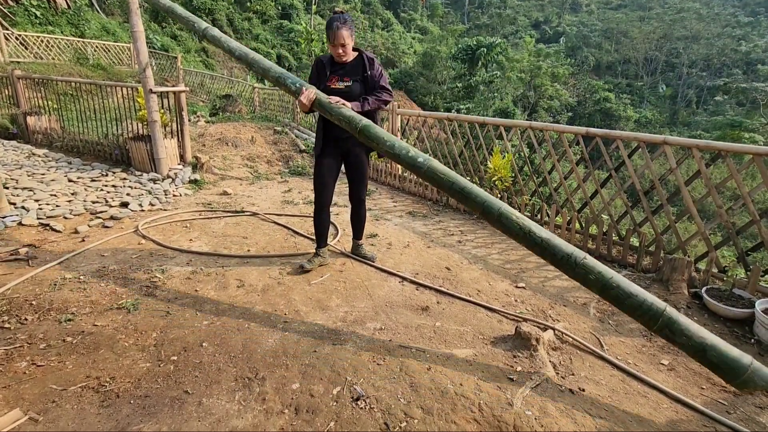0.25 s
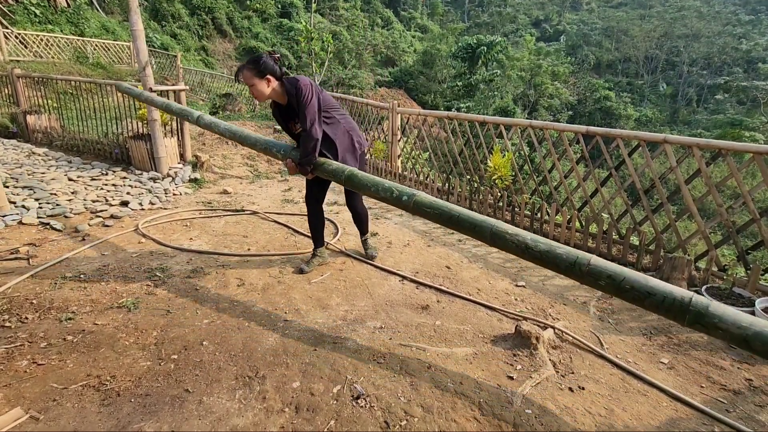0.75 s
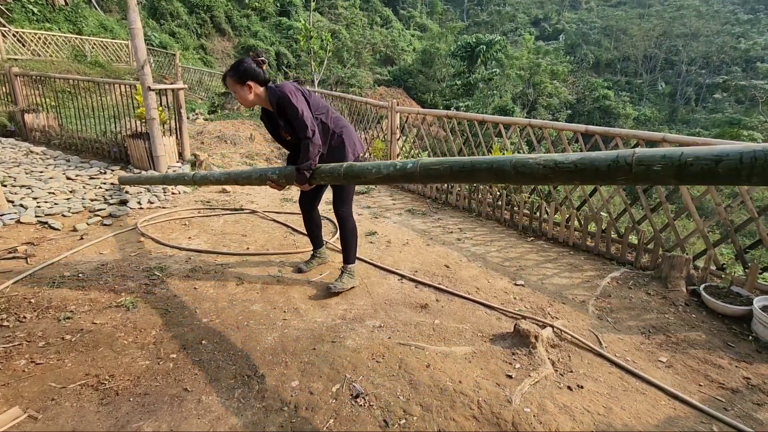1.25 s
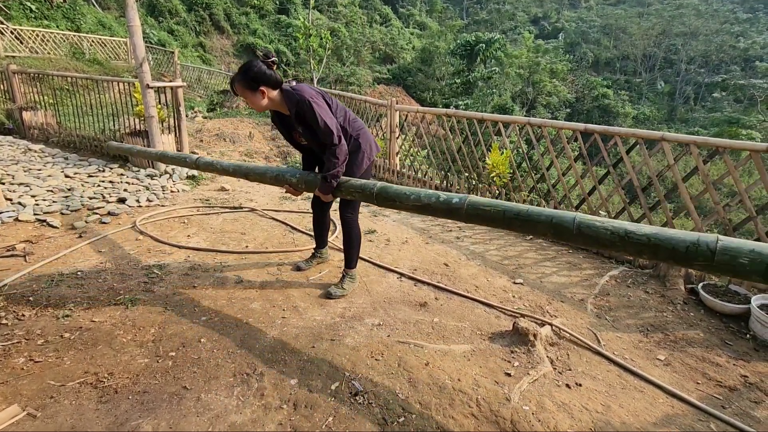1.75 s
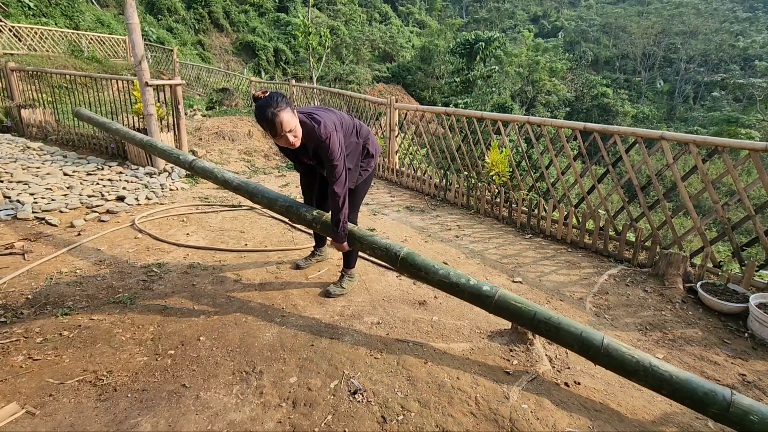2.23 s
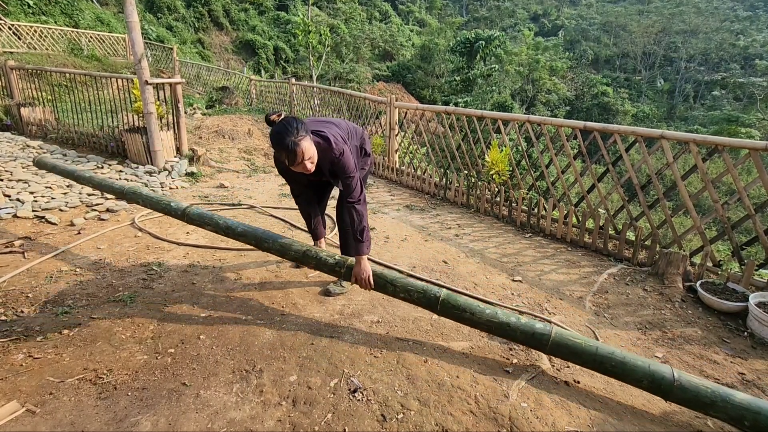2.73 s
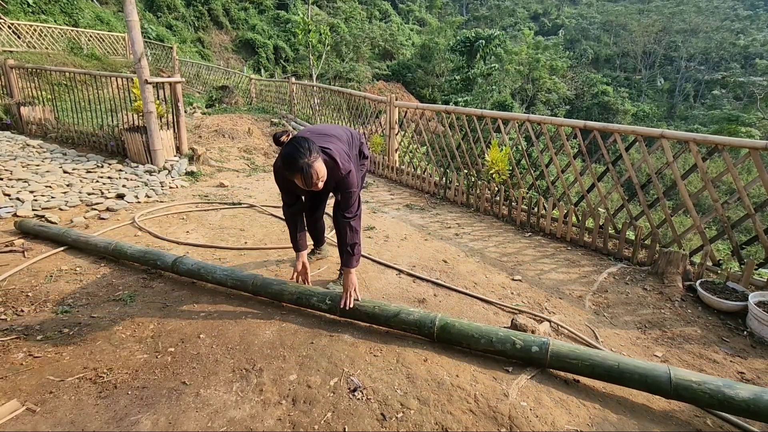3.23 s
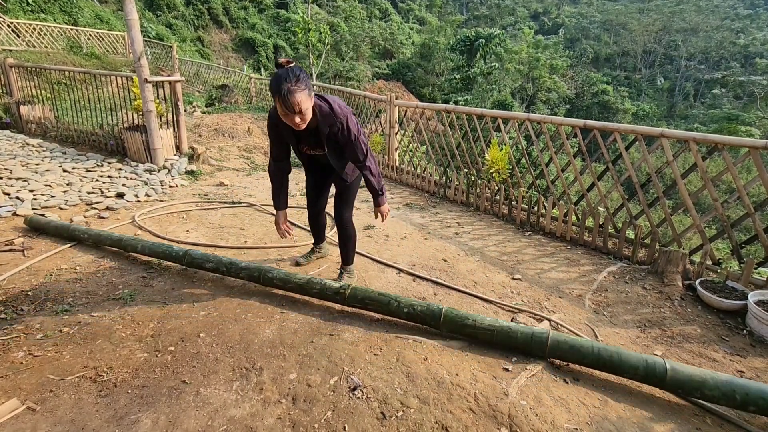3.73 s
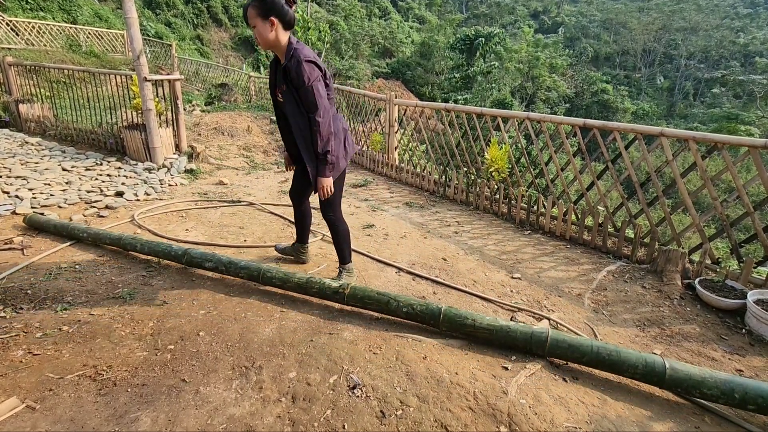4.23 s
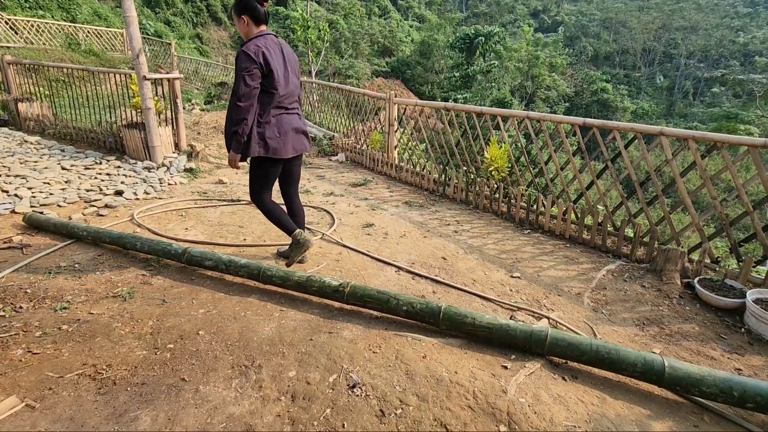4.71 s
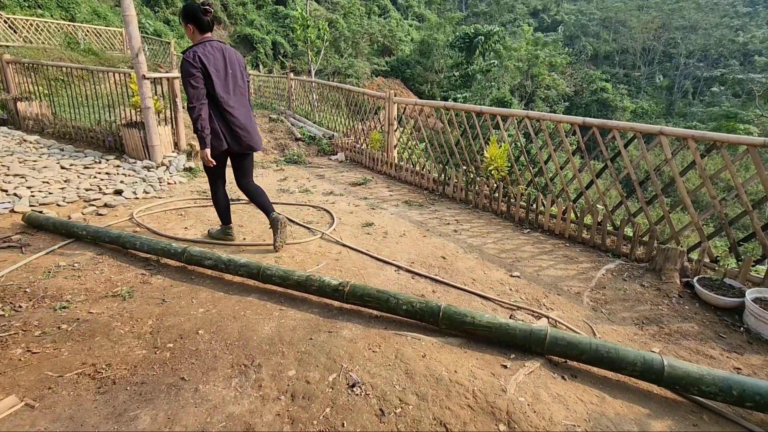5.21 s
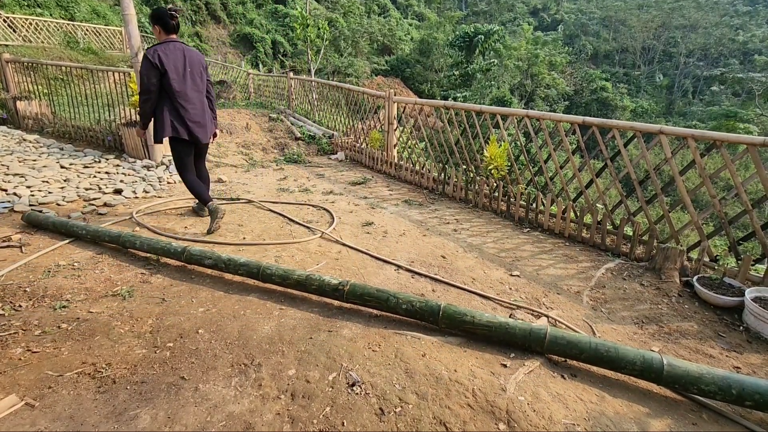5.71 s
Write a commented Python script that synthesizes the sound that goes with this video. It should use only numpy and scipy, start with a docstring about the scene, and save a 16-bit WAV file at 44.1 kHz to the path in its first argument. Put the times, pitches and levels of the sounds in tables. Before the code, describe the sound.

A long hollow bamboo pole knocks, clacks loudly and booms as it is set down on dry soil, then soft steps leave amid shrill insects.

```python
"""A long green bamboo pole is lowered to a dirt yard: it knocks, booms, lands and bounces to rest.
A jacket swishes against it, soft steps walk away over dry soil, insects shrill and a far bird whistles.
The pole is a sum of decaying modes, with noise through wall resonances for each clack.
Soil, cloth, insects and air are shaped noise; the bird and a faint low hum are gliding sines.
A thin diffuse tail, longest near 2400 Hz, follows the near sounds and the bird."""
import sys
import numpy as np
from scipy import signal
from scipy.fft import rfft, irfft, next_fast_len
from scipy.io import wavfile
from scipy.ndimage import uniform_filter1d, map_coordinates

SR = 44100
rng = np.random.default_rng(int(sys.argv[2]) if len(sys.argv) > 2 else 0)


def to_wav(s):
    """Save 16-bit WAV."""
    ch = np.atleast_2d(s).T  # columns
    pcm = np.round(np.clip(ch, -1, 1) * 32767)  # PCM
    wavfile.write(sys.argv[1], SR, pcm.astype(np.int16))


N = 262836  # length in samples

# blows on the pole: start_s, ring_db, ring_tilt_db_per_octave, place (0-1 along the pole), clack_db, clack_cut_hz
BLOWS = [(0.391, -36, -6.5, 0.15, -34.5, 5800), (0.407, -39.5, -0.5, .16, -38, 3000),
         (0.425, -46.5, -1.5, .16, -42.5, 3500), (0.503, -51.5, -9.5, 0.07, -51.5, 3000),
         (0.569, -48.5, -6, 0.3, -43, 1200), (1.3117, -45.5, 8.5, .5, -23.5, 2000),
         (1.3199, -33, 11, .5, -14.5, 2650), (1.353, -33, 5, .5, -21, 2300),
         (2.2087, -51.5, -3.5, 0.17, -34, 3400), (2.222, -47.5, 9, .09, -38.5, 2100),
         (2.7222, -40.5, -3, .3, -41.5, 2530), (2.752, -47.5, -2, .3, -45.5, 2800),
         (2.882, -55, 5.5, 0.38, -39, 4000), (2.9465, -40, 4, .3, -20, 5600),
         (2.963, -35, 1, .3, -36, 3000), (3.2448, -41, -3.5, .29, -22, 6000),
         (3.251, -44, -7.5, .29, -22, 8550), (3.3786, -51.5, 2, .15, -33.5, 3200)]
# spectrum of soft low thumps and air buffets: pitch_hz, level_db
THUMP_SPECTRUM = [(30, -15), (110, 3), (300, 8.5), (480, -5), (680, 3.5), (1000, -36), (3000, -51)]


def amp(db):
    """Level to amplitude: 20 dB is a factor of ten."""
    return 10 ** (np.asarray(db) / 20)


def unit(x):
    """Normalise the mean power: scale to rms 1."""
    return x / np.sqrt(np.mean(x ** 2) + 1e-20)


def along(points, hz):
    """Interpolate (hz, value) points on a logarithmic frequency axis."""
    point_hz, values = np.transpose(points)
    return np.interp(np.log(hz + 1), np.log(point_hz + 1), values)


def wobble(rate):
    """Band-limited fluctuation: a smooth random curve with rate knots a second."""
    knots = rng.standard_normal(int(N * rate / SR) + 4)
    return map_coordinates(knots, [np.arange(N) * rate / SR])


def filtered(x, response):
    """Linear filtering: multiply the spectrum of x by a complex response of frequency."""
    size = x.shape[-1]
    padded = next_fast_len(size + 8192)
    hz = np.fft.rfftfreq(padded, 1 / SR)
    return irfft(rfft(x, padded) * response(hz), padded)[..., :size]


def low_pass(hz, cut_hz, order):
    """Second-order resonator response: a causal low-pass of order equally damped pole pairs."""
    return (1 - (hz / cut_hz) ** 2 + 1j * np.sqrt(2) * hz / cut_hz) ** -order


def noise(spectrum, size, mono_hz=900):
    """Diffuse-field coherence: stereo noise of rms 1, alike in the bass and unrelated in the treble."""
    def mid_side(hz):
        turn = np.arccos(1 / (1 + (hz / mono_hz) ** 2)) / 2
        return amp(along(spectrum, hz)) * [np.cos(turn), np.sin(turn)]

    mid, side = filtered(rng.standard_normal((2, size)), mid_side)
    return unit(np.array([mid + side, mid - side]))


def add(track, start_s, sound):
    """Superposition: mix a sound into the track from start_s on."""
    part = track[:, max(0, round(start_s * SR)):][:, :sound.shape[-1]]
    part += sound[..., :part.shape[1]]


def pole_ring(travel_s=.002, swell_s=0.0011, lead_s=0.00017, scatter_db=1, phase_scatter=0.19,
              node_db=4.0, blur_hz=400, pivot_hz=280):
    """Modal superposition: each blow rings the modes; slow low bending waves arrive and swell later."""
    # bending modes below 800 Hz, hollow joints above: pitch_hz, level_db (relative), t60_s (before support loss)
    modes = [(44.05, -8.5, 2.5), (74, -4.5, 1.5), (116.6, 1, 0.82), (165.5, -1.5, 0.66), (218.9, -3.5, 0.7),
             (270.3, 4, 0.51), (308, 1, 0.47), (365.5, -0.5, 0.33), (423.4, -1, .3), (479, 0, 0.25),
             (522.2, 0.5, 0.18), (575, 1.5, 0.18), (620.7, 0, 0.15), (668, 3.5, 0.13), (707, 4, 0.15),
             (750, -7.5, 0.19), (853, -14.5, 0.21), (906, -21.5, 0.17), (1099, -13.5, .14),
             (1380, -3, 0.084), (1485, 0, 0.095), (1590, -2.5, 0.14), (1700, -12.5, .13), (2050, -13, 0.14),
             (2250, -18, .17), (2390, -14, 0.18)]
    # damping as the pole is hugged, swings free in the hands, then lies on soil: time_s, loss_per_s (at 270 Hz)
    support = [(.47, 6.4), (.53, 0.59), (1.5, 0.13), (2.7, 0.1), (3.45, 1.4)]
    # a blow's tilt acts between these pitches: low_hz, high_hz
    tilt_span = (111, 700)
    # harder blows have shorter contact: the ring's cut-off doubles for each 15 dB of clack
    contact_hz, contact_ref_db, db_per_doubling = 1230, -27, 15

    out, t = np.zeros((2, N)), np.arange(2 * SR) / SR
    channel_t = t + np.array([[lead_s], [0]])  # the left channel hears it first
    for start_s, ring_db, tilt_db, place, clack_db, _ in BLOWS:
        cut_hz = contact_hz * 2 ** ((clack_db - contact_ref_db) / db_per_doubling)
        absorbed = np.cumsum(np.interp(start_s + t, *np.transpose(support))) / SR
        scatter = rng.standard_normal((len(modes), 2))
        for k, ((hz, mode_db, t60), (size, phase)) in enumerate(zip(modes, scatter)):
            # a mode is weak when struck near a node; a broad contact blurs the nodes of short waves
            shape_db = node_db * np.cos(2 * np.pi * k * place) * abs(low_pass(hz, blur_hz, order=2))
            strength_db = ring_db + tilt_db * np.log2(np.clip(hz, *tilt_span) / pivot_hz)
            level_db = mode_db + strength_db + shape_db + scatter_db * size
            gain = amp(level_db) * abs(low_pass(hz, cut_hz, order=2))

            slow = np.sqrt(270 / hz)  # bending-wave travel time relative to 270 Hz
            age = np.maximum(channel_t[:, :int(1.2 * t60 * SR)] - travel_s * slow, 0)
            # the support stops wide, slow swings first
            loss = np.log(1000) * age / t60 + absorbed[:age.shape[1]] * slow ** 2
            life = (1 - np.exp(-age / (swell_s * slow ** 2))) * np.exp(-loss)
            add(out, start_s, gain * life * np.sin(2 * np.pi * (hz * age + phase_scatter * phase)))
    return out


def pole_clacks(lead_s=0.000382, diffuse=1.0, pivot_hz=1500, snap_s=0.00058):
    """Source and resonator: a snap and a rattle excite the hollow wall; soft contacts lose their treble."""
    # resonances of the hollow wall: pitch_hz, width_hz, level_db
    wall_modes = [(660, 170, -5), (1152, 160, 0), (1330, 200, -4), (1616, 160, -1), (1900, 230, 2),
                  (2088, 220, 0.5), (2280, 80, -6), (3340, 1200, -7), (3860, 900, -10.5),
                  (6880, 2400, -15.5), (13200, 5600, -23.5)]
    # hard blows snap, light ones only rattle: clack_db, snap_share (0-1 of the power)
    snap_shares = [(-37, 0), (-18, 0.5)]
    rattle_t60_s, tilt_db = 0.1, -2.5  # treble slope per octave above the pivot

    def wall(f):
        return sum(amp(db) * 1j * f * width / (centre * centre - f * f + 1j * f * width)
                   for centre, width, db in wall_modes)

    out, t = np.zeros((2, N)), np.arange(SR // 4) / SR
    for start_s, _, _, _, clack_db, cut_hz in BLOWS:
        def colour(f):
            treble = amp(tilt_db * np.log2(1 + (f / pivot_hz) ** 2) / 2)
            delay = np.exp(-2j * np.pi * f * np.array([[0], [lead_s]]))  # the right channel is later
            return wall(f) * low_pass(f, cut_hz, order=1) * treble * delay

        snap = np.interp(clack_db, *np.transpose(snap_shares))
        white = rng.standard_normal((4, len(t)))
        crack = unit(filtered(white[0] * np.exp(-t / snap_s), colour))
        decay = np.exp(-np.log(1000) * t / rattle_t60_s)
        rattle = unit(filtered((white[1] + diffuse * white[2:]) * decay, colour))
        add(out, start_s, amp(clack_db - 15.5) * (np.sqrt(snap) * crack + np.sqrt(1 - snap) * rattle))
    return out


def thuds(lead_s=0.000068):
    """Heavily damped oscillation: the flexing pole swings slowly for a moment over a short low rumble."""
    # dull low thuds of the flexing pole, first against its carrier, later on soil:
    # start_s, pitch_hz, level_db, length_s
    low_thuds = [(0.379, 62.3, -23, 0.091), (2.2, 59.6, -34.5, 0.046), (2.725, 83, -31.5, 0.033),
                 (2.876, 110, -23.5, 0.054), (2.956, 78.4, -20.5, 0.015), (3.057, 81, -34, 0.052),
                 (3.175, 112.5, -32.5, 0.057), (3.306, 100, -30, 0.021), (3.405, 102.5, -31, 0.018),
                 (3.463, 85, -45, 0.034)]
    # rumble under each thud: pitch_hz, level_db
    rumble_spectrum = [(20, -14), (60, 1), (150, -1.5), (400, -3), (900, -15), (3000, -42)]
    rumble_db, rumble_t60_s = -17, 0.56  # level relative to the thud

    out, t = np.zeros((2, N)), np.arange(SR // 2) / SR
    channel_t = t + np.array([[lead_s], [0]])
    decay = np.exp(-np.log(1000) * t / rumble_t60_s)
    for start_s, hz, level_db, length_s in low_thuds:
        arch = np.sin(np.pi * np.clip(channel_t / length_s, 0, 1))
        swing = arch * np.sin(2 * np.pi * hz * channel_t)
        rumble = noise(rumble_spectrum, len(t)) * np.minimum(t / length_s, 1) * decay
        add(out, start_s, amp(level_db) * (swing + amp(rumble_db) * rumble))
    return out


def scuffs(rise_s=.002, grain_db=-1.0):
    """Granular friction: each touch of the ground is a soft thump, a scrape and crumbling grit."""
    # shoes and pole scuffing dry soil, levels before a common gain of 2: start_s, thump_db, scrape_db, grit_db
    touches = [(0.491, -68, -62, -47.5), (0.726, -50.5, -56.5, -79), (2.893, -37.5, -45.5, -37),
               (2.969, -43, -58, -42.5), (3.036, -59, -53.5, -54), (3.151, -59, -56.5, -60),
               (3.247, -65, -63, -35.5), (3.530, -72.5, -61.5, -81), (4.6, -79, -58.5, -71),
               (4.941, -56, -68, -78), (4.993, -53.5, -54, -76), (5.05, -55.5, -75, -78),
               (5.119, -48.5, -60, -77), (5.58, -54, -52.5, -55)]
    # spectra of the scrape and of the grit: pitch_hz, level_db
    scrape_spectrum = [(400, -33), (750, 7.5), (1050, 15), (1500, 7.5), (2200, 8.5), (4000, -19),
                       (9000, -50.5)]
    grit_spectrum = [(800, -31), (3000, 3.5), (5500, -0.5), (8000, 4.5), (10000, -9.5), (15000, -6.5)]
    t60_s = 0.093

    out, t = np.zeros((2, N)), np.arange(SR // 4) / SR
    life = (1 - np.exp(-t / rise_s)) * np.exp(-np.log(1000) * t / t60_s)
    for start_s, thump_db, scrape_db, grit_db in touches:
        grain = unit(uniform_filter1d(rng.standard_normal(len(t)), size=60))
        crumbs = unit(amp(grain_db * grain))
        scrape = amp(scrape_db) * noise(scrape_spectrum, len(t))
        grit = amp(grit_db) * noise(grit_spectrum, len(t))
        thump = amp(thump_db) * noise(THUMP_SPECTRUM, len(t))
        add(out, start_s, 2 * life * (thump + crumbs * (scrape + grit)))
    return out


def jacket(gain_db=10, grain_db=2.0):
    """Sliding friction: cloth rubs the pole and itself in uneven swishes whose powers add."""
    # strokes of the jacket, levels before the common gain: peak_s, level_db, rise_s, fall_s
    strokes = [(.14, -63, 1, 0.58), (.46, -61.5, 0.41, 0.26), (.58, -62, 0.054, 0.15),
               (.72, -74, 0.089, .17), (1.05, -60, .2, .07), (2.0, -61.5, 0.17, 0.073),
               (2.23, -64, .03, 0.089), (2.74, -63, 0.13, 0.076), (2.93, -59.5, 0.29, 0.25),
               (3.36, -68.5, 0.6, 0.3), (3.95, -75.5, 0.2, .3), (5.0, -72.5, 0.077, 0.15),
               (5.61, -65, 0.053, 0.082)]
    # spectrum of the cloth: pitch_hz, level_db
    cloth_spectrum = [(150, -8.5), (400, 6.5), (800, 8.5), (1500, 12.5), (2400, 14.5), (4000, 9),
                      (8000, 11), (10000, -6), (12500, 8.5), (15500, -2.5)]
    # a stroke gains and loses depth_db over its rise and fall; rest_db (before the gain) rustles between
    depth_db, rest_db = 20, -87

    t, power = np.arange(N) / SR, amp(rest_db) ** 2
    for peak_s, level_db, rise_s, fall_s in strokes:
        distance = np.maximum((peak_s - t) / rise_s, (t - peak_s) / fall_s)
        power = power + amp(level_db - depth_db * distance) ** 2
    return np.sqrt(power) * amp(gain_db + grain_db * wobble(250)) * noise(cloth_spectrum, N)


def yard(x):
    """Convolution with decaying noise: a thin diffuse tail of outdoor echo and the pole's long ring."""
    # a thin diffuse tail: outdoor echo, with the hollow pole's long ring near 2400 Hz: pitch_hz, t60_s
    tail_decay = [(100, 0.59), (600, 0.17), (900, 0.12), (1200, 0.27), (1900, 0.21), (2400, 0.64),
                  (2900, 0.12), (5000, 0.39), (12000, 0.4)]
    hz, t, grains = signal.stft(rng.standard_normal((2, SR // 2)), SR, nperseg=256)
    decay = np.exp(-np.log(1000) * t / along(tail_decay, hz)[:, None])
    tail = signal.istft(grains * decay, SR, nperseg=256)[1]
    late = np.pad(tail, ((0, 0), (SR // 100, 0)))  # the tail begins 10 ms late
    return signal.fftconvolve(x, late / np.linalg.norm(tail[0]), axes=1)[:, :N]


def bird(waver=0.016, lead_s=0.000096, flutter_db=3, far_db=-4):
    """Frequency modulation: thin, fluttering whistles slide down, blurred by the diffuse tail."""
    # a far bird repeats one falling whistle: start_s, level_db
    whistles = [(0.172, -59), (1.111, -59.5), (2.15, -69), (5.611, -61.5)]
    length_s, start_hz, end_hz = .2, 4870, 4000  # pitches before the waver

    out = np.zeros((2, N))
    pitch = 1 + waver * wobble(160)
    flutter = amp(flutter_db * wobble(45))
    u = np.linspace(0, 1, int(length_s * SR))
    slide = end_hz + (start_hz - end_hz) * np.cos(np.pi * u / 2) ** 2
    swell = np.sqrt(abs(np.sin(np.pi * u)))
    for start_s, level_db in whistles:
        hz = slide * pitch[int(start_s * SR):][:len(u)]
        cycles = np.cumsum(hz) / SR + hz * np.array([[lead_s], [0]])
        add(out, start_s, amp(level_db) * swell * np.sin(2 * np.pi * cycles))
    song = out * flutter
    return song + amp(far_db) * yard(song)


def hum(waver_hz=6.5, waver_db=3.5):
    """Phase as the integral of pitch: a faint low hum swells, climbs towards its top pitch and dies away."""
    # swells of the hum: start_s, length_s, level_db
    swells = [(1.805, 1, -60), (3.499, 1, -61)]
    start_hz, top_hz, climb_s = 90, 124, .27  # pitches before the waver

    out, t = np.zeros(N), np.arange(N) / SR
    for start_s, length_s, level_db in swells:
        age = np.clip(t - start_s, 0, length_s)
        hz = top_hz + (start_hz - top_hz) * np.exp(-age / climb_s) + waver_hz * wobble(4.8)
        arch = np.sqrt(abs(np.sin(np.pi * age / length_s)))
        level = amp(level_db + waver_db * wobble(5.46))
        out += level * arch * np.sin(2 * np.pi * np.cumsum(hz) / SR)
    return out


def hillside(insect_db=-59.0, air_db=-64, leaves_db=-73, buffet_db=-73):
    """Incoherent sum of many sources: an insect chorus, and air in the trees with rustles and buffets."""
    # spectra of the chorus, the air and the rustling leaves: pitch_hz, level_db
    insect_spectrum = [(5000, -55.5), (5950, -16), (6250, -2.5), (6600, 0.5), (6900, -0.5), (7150, -2.5),
                       (7500, -1.5), (7630, -20.5), (8500, -22), (9200, -68)]
    air_spectrum = [(20, -11.5), (60, 4.5), (130, -2), (220, -4.5), (400, 1), (520, -6.5), (650, -4.5),
                    (850, -15.5), (1200, -16.5), (2000, -10), (2800, -19), (4000, -11.5), (4800, -10.5),
                    (5600, -15.5), (8000, -16.5), (8800, -26.5), (9500, -60.5), (16000, -41.5)]
    leaf_spectrum = [(700, -26), (1300, -15.5), (2200, 4.5), (3000, -4.5), (4700, -2.5), (6000, -17),
                     (9000, -42.5)]
    # the chorus leans right, one row for left and one for right: level_db
    insect_side = [
        [-1.7],
        [1.7],
    ]

    chorus_level = amp(insect_db + 0.42 * wobble(3) + 0.77 * wobble(66))
    chorus = chorus_level * noise(insect_spectrum, N) * amp(insect_side)
    air = amp(air_db + 0.23 * wobble(4.0)) * noise(air_spectrum, N)
    leaves = amp(leaves_db + 2.7 * wobble(22)) * noise(leaf_spectrum, N)
    buffets = amp(buffet_db + 2.8 * wobble(37)) * noise(THUMP_SPECTRUM, N)
    return chorus + air + leaves + buffets


def scene(tail_db=-21):
    """Direct and diffuse sound: the pole and its carrier in the yard, the hillside behind."""
    near = pole_ring() + pole_clacks() + thuds() + scuffs() + jacket()
    return near + amp(tail_db) * yard(near) + bird() + hum() + hillside()


def record(dry, top_hz=15650):
    """Band limitation: nothing at or above top_hz is kept."""
    return filtered(dry, lambda hz: hz < top_hz)


dry = scene()
out = record(dry)
to_wav(out)
```